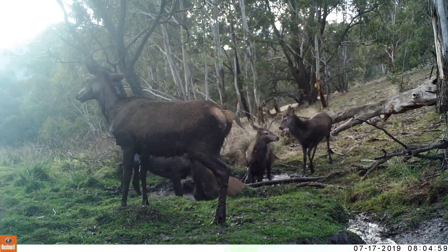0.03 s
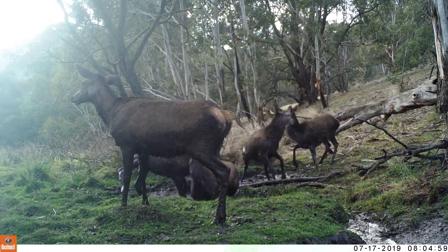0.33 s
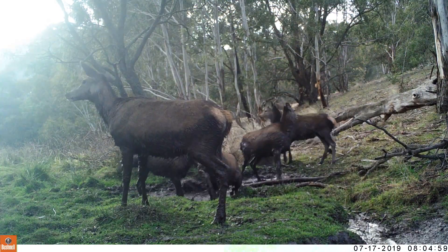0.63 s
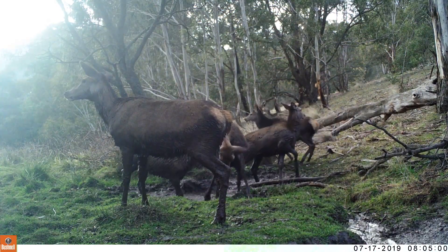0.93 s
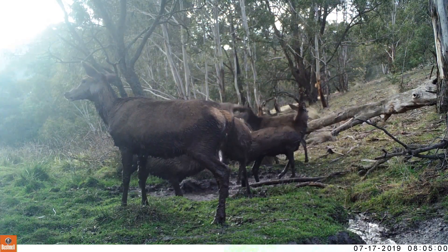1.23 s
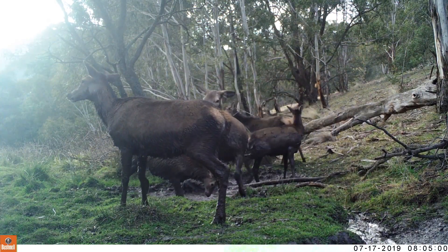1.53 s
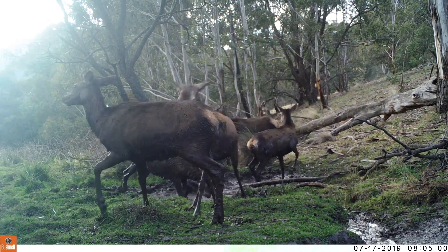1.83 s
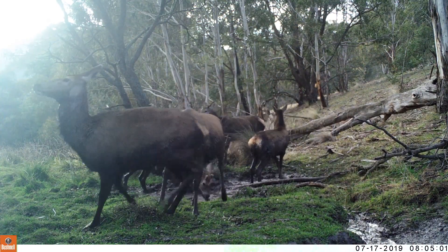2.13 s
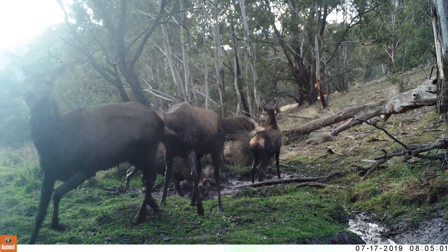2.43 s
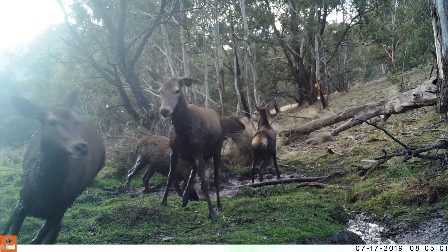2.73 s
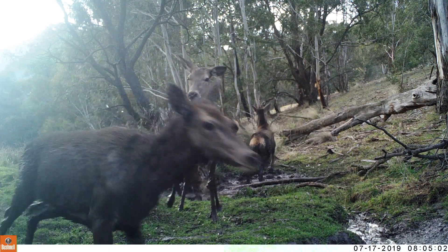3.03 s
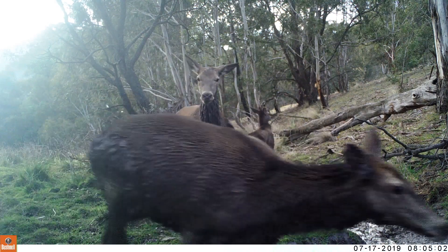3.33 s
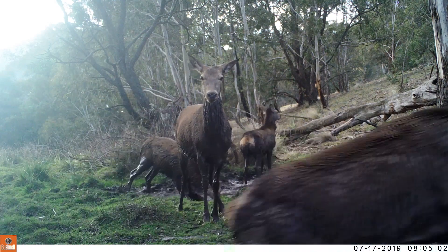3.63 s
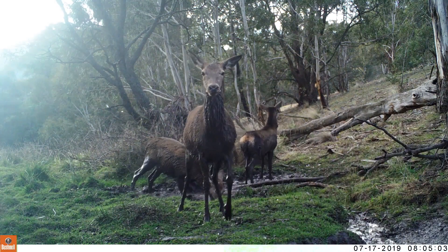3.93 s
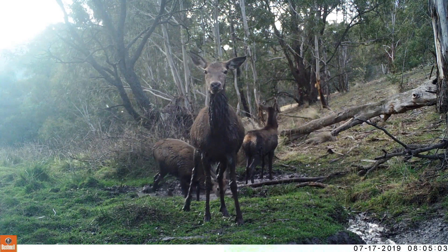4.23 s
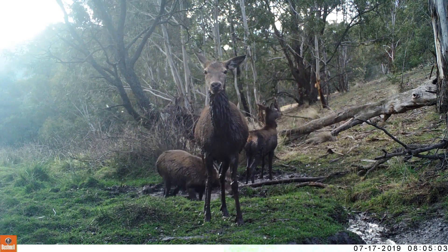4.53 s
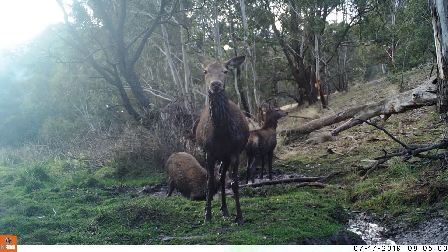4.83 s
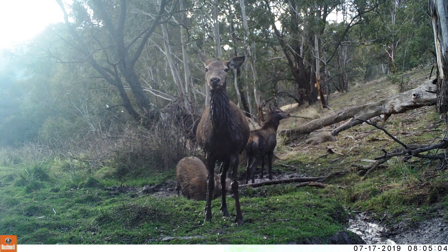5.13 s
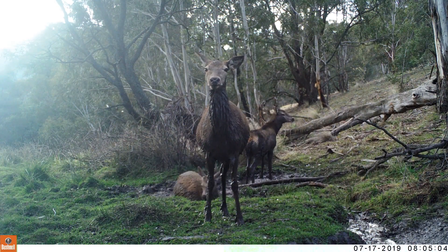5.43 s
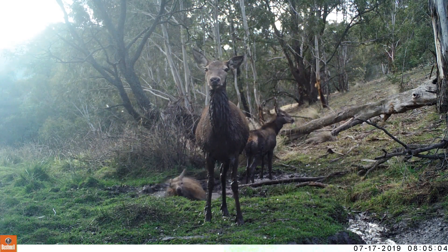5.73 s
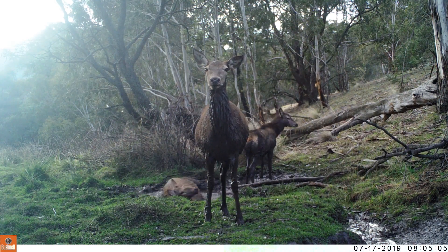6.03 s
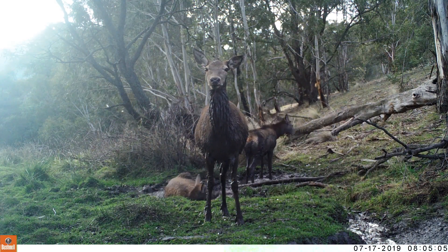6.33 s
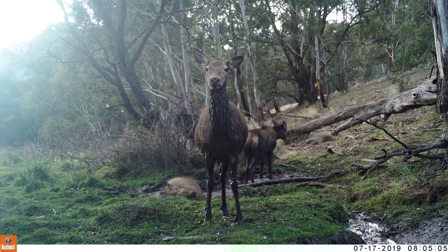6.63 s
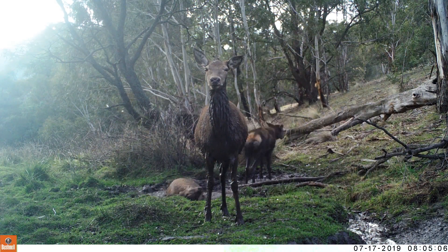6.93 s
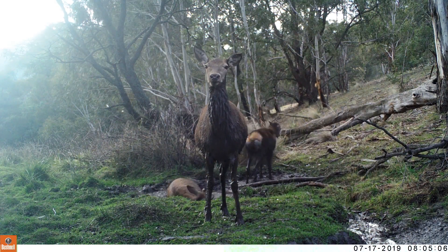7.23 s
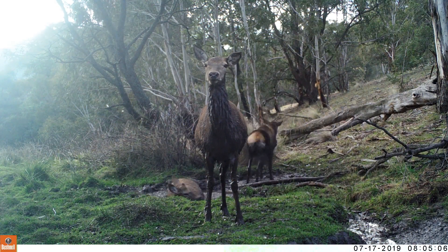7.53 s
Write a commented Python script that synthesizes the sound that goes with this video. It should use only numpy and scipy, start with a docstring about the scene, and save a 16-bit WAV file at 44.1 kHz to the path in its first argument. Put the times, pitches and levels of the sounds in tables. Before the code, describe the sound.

In quiet, damp woods, air flutters softly on a fixed outdoor microphone above a hollow hiss. Deer hooves thump and squish irregularly in wet turf, with a faint slosh of mud further off. The steps grow closer and busier in the middle, with sharp little ticks of breaking stems, then settle. A soft rustle of leaves and pattering drops rises at the end.

```python
"""Deer at a muddy wallow

Deer move about in damp woodland; one walks right past a camera on a post. Hooves thud dully on soft ground,
squeeze water through the turf and snap small stems; bubbles pip and mud sloshes further off. Moving air rumbles
on the microphone over a thin hiss; about a second in, the midrange of this background turns hollow and
wavering. At the end a breeze sets the wet leaves pattering."""
import sys
import numpy as np
from scipy import signal
from scipy.fft import rfft, irfft, next_fast_len
from scipy.io import wavfile
from scipy.ndimage import uniform_filter1d, map_coordinates

SR = 44100
rng = np.random.default_rng(int(sys.argv[2]) if len(sys.argv) > 2 else 0)


def wrap_up_sound(samples):
    """Save the sound to the file named by the first command line argument, as 16-bit audio."""
    columns = np.atleast_2d(samples).T
    # keep every value between -1 and 1, then stretch to whole-number steps
    tamed = np.clip(columns, -1, 1)
    steps = np.round(tamed * 32767).astype(np.int16)
    wavfile.write(sys.argv[1], SR, steps)


N = 338688
SETTLE_S = 4.39  # the herd starts to settle here

# Sub-bass of buffeting air and heaving ground: freq_hz, level_db
SUB_SPECTRUM = [(4, 3.5), (10, 6.5), (20, -8.5), (32, 2), (50, -12.5), (80, -14.5), (130, -32),
                (250, -46.5), (600, -67.5), (2000, -110)]
# Bright fizz of wet turf and mud: freq_hz, level_db
WET_SPECTRUM = [(300, -9.5), (1400, -7), (1900, -75), (2200, -2), (3500, 2), (5000, 4), (6200, 1.5),
                (7200, -6.5), (8500, -7), (10500, -17), (14000, -38)]


def amp(db):
    """Decibels to gain."""
    return 10 ** (np.asarray(db) / 20)


def unit(x):
    """Scale to rms 1."""
    return x / np.sqrt(np.mean(x ** 2) + 1e-20)


def clock():
    """The time of every sample in seconds."""
    return np.arange(N) / SR


def filtered(x, response):
    """EQ x with a gain given as a function of frequency."""
    size = next_fast_len(N + 8192)
    return irfft(rfft(x, size) * response(np.fft.rfftfreq(size, 1 / SR)), size)[:N]


def coloured(x, spectrum):
    """Shape x with an EQ curve of (freq_hz, level_db) points, at rms 1."""
    freq_hz, level_db = np.transpose(spectrum)
    return unit(filtered(x, lambda hz: amp(np.interp(np.log(hz + 1), np.log(freq_hz), level_db))))


def noise():
    """White noise."""
    return rng.standard_normal(N)


def wobble(rate_hz):
    """A smooth random curve with rate_hz knots a second."""
    return map_coordinates(rng.standard_normal(1024), [clock() * rate_hz], mode="wrap")


def steadied(x, span_s):
    """Level a noise, evening out swells slower than span_s."""
    size = max(int(span_s * SR), 8)
    power = uniform_filter1d(uniform_filter1d(x ** 2, size), size)
    return x / np.sqrt(np.abs(power) + 1e-9)


def crackle(rate_hz, spread_db, blur_db):
    """Tiny impacts of uneven size over the blur of countless smaller ones."""
    sizes = amp(spread_db * np.minimum(rng.exponential(size=N), 4)) * np.sign(noise())
    impacts = sizes * (rng.random(N) < rate_hz / SR)
    return unit(unit(impacts) + amp(blur_db) * noise())


def swell(level_db, at_s, rise_db_per_s, fall_db_per_s):
    """An envelope that ramps to level_db at at_s, then falls or holds."""
    t = clock() - at_s
    return amp(level_db + rise_db_per_s * np.minimum(t, 0) - fall_db_per_s * np.maximum(t, 0))


def push(start_s, attack_s):
    """A load that starts softly, peaks attack_s later and dies away."""
    age = np.maximum(clock() - start_s, 0) / attack_s
    return (age * np.exp(1 - age)) ** 2


def pings(rows, cycles, tail_db, tail_t60_s):
    """Short damped rings of so many cycles; the grass around scatters a faint tail."""
    out, t = np.zeros(N + SR), np.arange(SR // 20) / SR
    scatter = coloured(noise(), WET_SPECTRUM)
    for start_s, peak_db, pitch_hz in rows:
        start = min(round(start_s * SR), N - 1)
        age = t * pitch_hz / cycles
        ring = 2 * age * np.exp(1 - 2 * age) * np.sin(2 * np.pi * pitch_hz * t)
        tail = amp(tail_db - 60 * t / tail_t60_s) * np.roll(scatter, -start)[:len(t)]
        out[start:start + len(t)] += amp(peak_db) * (ring + tail)
    return out[:N]


def air_bed():
    """Air flutters on the microphone over a low rumble and a thin, even hiss."""
    # Strength of the draught, with a lull before the breeze: time_s, level_db
    draught = [(0, -44.5), (1.2, -48), (2.1, -47), (3.3, -47), (5.3, -46.5), (5.8, -49.5), (6.45, -49.5),
               (7.0, -47), (7.68, -44.5)]
    # Low woodland rumble: freq_hz, level_db
    rumble_spectrum = [(20, -14), (60, -0.5), (115, -2), (160, -5), (250, -10), (450, -17), (690, -22),
                       (810, -18), (950, -25), (1300, -28.5), (1600, -30.5), (2000, -52), (4000, -75)]
    # Thin hiss: freq_hz, level_db
    hiss_spectrum = [(300, -38), (1300, -3), (1620, 0.5), (1950, 2), (2200, -2.5), (3400, -3), (4600, -1),
                     (6100, -4), (6900, -8), (8200, -10), (10000, -12), (14000, -18.5)]
    buffet_db = np.interp(clock(), *np.transpose(draught)) + 2.5 * wobble(13)
    buffet = amp(buffet_db) * steadied(coloured(noise(), SUB_SPECTRUM), span_s=0.029)
    rumble = amp(-56.5 + 1.26 * wobble(14)) * coloured(noise(), rumble_spectrum)
    hiss = amp(-69) * coloured(noise(), hiss_spectrum)
    return buffet + rumble + hiss


def air_puffs():
    """Each puff of air swings the pressure on the microphone once: a soft, low bump."""
    # Puffs of air: centre_s, peak_db, half_width_s
    puffs = [(0.038, -27, 0.0093), (0.149, -27, 0.0076), (0.533, -39, 0.0083), (0.783, -34, 0.01),
             (1.174, -37.5, 0.014), (1.953, -38, 0.0096), (2.122, -42.5, 0.017), (2.282, -46, .007),
             (4.243, -35.5, 0.014), (5.343, -29, 0.017), (6.601, -39.5, 0.0059), (6.666, -40.5, 0.013),
             (7.099, -35, 0.0062), (7.363, -36, .012), (7.432, -36, .011), (7.569, -30, 0.0084)]
    out, t = np.zeros(N), clock()
    for centre_s, peak_db, half_width_s in puffs:
        age = (t - centre_s) / half_width_s
        out += amp(peak_db) * age * np.exp(0.5 * (1 - age ** 2))
    return out


def hollowed(x):
    """Wandering notches open about a second in and turn the midrange hollow and watery."""
    # Midrange notches: centre_hz, half_width_hz, depth_db, waver_ratio
    notches = [(804, 50.6, 30, 0.38), (1447, 26, 15, 3), (1663, 92, 37, 0.83), (1925, 120, 36, 0.26)]
    hz, t, spectra = signal.stft(x, SR, nperseg=1024, noverlap=768)
    opened = np.interp(t, [0.89, 0.93], [0, 1])
    for centre_hz, half_width_hz, depth_db, waver in notches:
        spread = np.interp(t, clock(), wobble(34))
        stray = np.interp(t, clock(), wobble(34))
        width = half_width_hz * np.maximum(1 + waver * spread, 0.01)
        centre = centre_hz + 0.93 * waver * half_width_hz * stray
        dip = 1 / (1 + ((hz[:, None] - centre) / width) ** 8)
        spectra = spectra * amp(-depth_db * opened * dip)
    return signal.istft(spectra, SR, nperseg=1024, noverlap=768)[1][:N]


def leaves():
    """Wet leaves brush together in small clumps as the breeze rises and holds; drops patter on them."""
    # Leaves brushing: freq_hz, level_db
    leaf_spectrum = [(300, -25), (650, -39), (800, -29), (920, -2.5), (1200, -2.5), (1500, 0.5), (1750, 1),
                     (1950, 14), (2150, -7), (3400, -4), (4500, -1), (5700, -8), (7000, -9), (10000, -18),
                     (14000, -49)]
    # Drops tapping on wet leaves: freq_hz, level_db
    drop_spectrum = [(800, -42), (2800, -10), (4000, 2), (4650, 1), (5600, 1), (7500, -12), (14000, -34)]
    clumps = amp(1.5 * wobble(70))
    rustle = clumps * coloured(crackle(rate_hz=1600, spread_db=3.5, blur_db=3), leaf_spectrum)
    patter = amp(4 * wobble(160))
    drops = patter * coloured(crackle(rate_hz=900, spread_db=1.5, blur_db=0), drop_spectrum)
    breeze = swell(-60.5, at_s=7.016, rise_db_per_s=34, fall_db_per_s=0)
    return breeze * (rustle + amp(-5.5) * unit(drops))


def wallow():
    """Further off, trampled mud fizzes restlessly, and one deer heaves itself out with a dull slosh."""
    # Thick mud sloshing: freq_hz, level_db
    mud_spectrum = [(150, -16), (450, 1.5), (820, -14.5), (1200, -8), (1900, -29), (2200, -14), (4000, -13),
                    (9000, -68)]
    churn = amp(1.3 * wobble(30))
    herd = swell(-71.5, at_s=SETTLE_S, rise_db_per_s=0, fall_db_per_s=45)
    splash = swell(-72.5, at_s=0.82, rise_db_per_s=13, fall_db_per_s=77)
    body = swell(-71, at_s=0.82, rise_db_per_s=-0.5, fall_db_per_s=77)
    fizz = coloured(crackle(rate_hz=1200, spread_db=2.5, blur_db=2), WET_SPECTRUM)
    slosh = coloured(crackle(rate_hz=700, spread_db=4, blur_db=5), mud_spectrum)
    return churn * (np.hypot(herd, splash) * fizz + body * slosh)


def herd_steps():
    """The herd treads lightly at random until it settles: rows for hoof_squelches."""
    rate_hz, half_width_s, smack_db, spit_db = 3.6, 0.0027, -1.5, -20
    gaps, weights = rng.random((64, 2)).T
    times_s = np.cumsum(0.5 + gaps) / rate_hz
    levels_db = -65.5 + 5 * (weights - 0.5)
    return [(crest_s, level_db, half_width_s, smack_db, spit_db)
            for crest_s, level_db in zip(times_s, levels_db) if crest_s < SETTLE_S]


def bubbles():
    """A bubble or drip rings for a few cycles: a tiny pip."""
    # Bubbles and drips: start_s, peak_db, pitch_hz
    pips = [(.7203, -49.5, 3680), (.856, -41.5, 5650), (1.675, -48, 5950), (2.0318, -45, 6150),
            (2.232, -54, 5600), (3.0402, -46, 4600), (3.0435, -50.5, 1710), (3.507, -51, 1650),
            (3.5095, -52, 1110), (3.5625, -58.5, 1770), (6.3483, -57, 3930), (6.8395, -52.5, 4130),
            (6.9542, -50, 4090), (7.0145, -47, 4740), (7.101, -46, 3970), (7.1318, -51, 5250),
            (7.1742, -48, 4630), (7.283, -50, 4190), (7.3697, -49, 4650), (7.5563, -49, 4300),
            (7.642, -44, 4660)]
    return pings(pips, cycles=3, tail_db=-17, tail_t60_s=0.025)


def stem_snaps():
    """A stem breaks underfoot in about one cycle: a sharp tick."""
    # Cracking stems: start_s, peak_db, pitch_hz
    snaps = [(.4405, -44.5, 4400), (1.0695, -58, 6500), (2.6486, -41, 5700), (3.045, -47, 2330),
             (3.0484, -35, 5300), (3.312, -50, 6000), (3.3285, -50, 6500), (3.4625, -46, 2980),
             (3.5135, -39.5, 2440), (3.6374, -47.5, 4600), (3.848, -49, 5500), (3.8571, -41.5, 3930),
             (3.8862, -43, 6600), (3.9355, -41, 7000), (3.9546, -26, 7100), (4.1145, -45, 3600),
             (4.131, -52, 5500), (4.2769, -42, 5150), (4.3795, -43, 4500), (4.4595, -46, 4500),
             (4.7275, -55, 3820), (5.0685, -46, 4120), (5.1285, -53, 4700), (7.6411, -40, 4560)]
    return pings(snaps, cycles=1.05, tail_db=-27, tail_t60_s=0.017)


def hoof_thuds():
    """Soft ground takes each hoof without ringing: a slap of mud on a low thud, over a slower heave."""
    # Heavy footfalls: start_s, level_db, attack_s, slap_db
    footfalls = [(0, -32.5, 0.0065, -28.5), (0.03, -39, 0.039, -68), (0.188, -33, 0.019, -43),
                 (.265, -36.5, 0.046, -64), (.365, -73, 0.015, -50), (1.165, -48, 0.023, -70),
                 (3.108, -35.5, 0.022, -58), (3.203, -36.5, 0.024, -52.5), (3.494, -40, 0.018, -51),
                 (3.669, -38, 0.0076, -60), (3.735, -50.5, 0.028, -50.5), (3.825, -38, 0.023, -52),
                 (3.995, -36.5, 0.034, -49), (4.292, -32.5, 0.031, -43.5), (4.337, -38, 0.024, -44),
                 (4.412, -38, 0.034, -57), (4.62, -34, 0.02, -59), (4.706, -33, 0.014, -62),
                 (4.749, -38.5, 0.022, -43), (4.792, -43, 0.022, -46.5), (4.927, -38, 0.021, -48),
                 (4.968, -41.5, 0.031, -49), (5.048, -39, 0.014, -52.5), (5.27, -33, 0.017, -44),
                 (5.325, -46, 0.058, -67)]
    # Dull thud of soft ground: freq_hz, level_db
    ground_spectrum = [(15, -56), (30, 11), (60, 8), (100, -4), (160, -32), (300, -44), (600, -60),
                       (2000, -87)]
    # Flat slap of a hoof in mud: freq_hz, level_db
    slap_spectrum = [(40, -15.5), (90, -7.5), (130, 6), (200, -8.5), (300, -16), (450, -26), (700, -32),
                     (2000, -57)]
    thud_power, slap_power, heave_power = np.zeros((3, N))
    for start_s, level_db, attack_s, slap_db in footfalls:
        load = push(start_s, attack_s)
        thud_power += (amp(level_db) * load) ** 2
        slap_power += (amp(slap_db) * load) ** 2
        heave_power += (amp(level_db) * push(start_s, attack_s=0.052)) ** 2
    thud = np.sqrt(thud_power) * steadied(coloured(noise(), ground_spectrum), span_s=0.0081)
    slap = np.sqrt(slap_power) * steadied(coloured(noise(), slap_spectrum), span_s=0.02)
    heave = np.sqrt(heave_power) * steadied(coloured(noise(), SUB_SPECTRUM), span_s=0.035)
    return thud + slap + heave


def hoof_squelches():
    """Water fizzes through pressed turf; deep holes add a hollow smack, sharp steps a bright spit."""
    # Close hooves in wet turf: crest_s, level_db, half_width_s, smack_relative_db, spit_relative_db
    close_steps = [(.515, -64, 0.034, -10, -11), (.685, -66.5, 0.016, -14, -10),
                   (.725, -67.5, 0.014, 0, -20), (.79, -69.5, 0.027, -9, -25), (.875, -67, 0.018, -16, -6),
                   (1.075, -74.5, 0.0073, -20, 4), (1.686, -66.5, 0.018, -5, -23),
                   (1.889, -66, 0.0066, -2, -25), (2.018, -68, 0.034, -11, -22),
                   (2.236, -65.5, .011, -8, -16), (2.463, -66, .009, -5, -10),
                   (2.648, -68.5, 0.018, -4, -6), (2.79, -67, .009, -4, -7), (2.868, -67.5, 0.0029, -23, 1),
                   (3.0445, -57.5, .0055, -2, -21), (3.06, -64.5, .012, -6, -20),
                   (3.315, -57, 0.0049, -18, -9), (3.41, -64, 0.015, -8, -4),
                   (3.452, -60.5, 0.014, -4, -15), (3.5098, -55.5, 0.008, -5, -6),
                   (3.563, -59.5, 0.0062, -3, -9), (3.796, -65.5, 0.0056, 2, -25),
                   (3.86, -62, 0.0079, -25, -14), (3.937, -53, 0.0029, -28, -8),
                   (3.966, -65, 0.014, -7, -12), (4.064, -65.5, 0.015, -8, -14),
                   (4.124, -61, 0.019, -33, -5.5), (4.279, -58, .0028, -28, -9),
                   (4.381, -65.5, 0.014, -11, -13), (4.735, -69.5, 0.06, -38, -26),
                   (5.075, -59.5, 0.0071, -32, -12), (5.135, -65.5, 0.017, -30, -6),
                   (5.791, -62.5, 0.0056, -27, -24), (6.349, -68, 0.0035, -14, -25),
                   (6.846, -66.5, 0.013, -4, -14), (6.956, -65, 0.0042, -14, -25)]
    # Hollow smack of a deep hoof hole: freq_hz, level_db
    smack_spectrum = [(300, -30), (800, -40), (1100, -20), (1500, -9), (1900, -13), (2130, 5.5), (2500, 4),
                      (3400, -5), (6000, -47), (14000, -55)]
    # Fine spray spat from under a hoof: freq_hz, level_db
    spit_spectrum = [(2500, -54), (5000, -11), (7000, 4), (9000, -4.5), (11500, -10.5), (14000, -22)]
    fizz, smack, spit = np.zeros((3, N))
    t = clock()
    for crest_s, level_db, half_width_s, smack_db, spit_db in list(close_steps) + herd_steps():
        near = np.abs(t - crest_s) < 0.3
        offset_s = t[near] - crest_s
        # The hoof presses in quickly and lets go more slowly.
        flank_s = half_width_s * np.where(offset_s < 0, 0.85, 1.1)
        steepness = np.where(offset_s < 0, 3.6, 3)
        press = amp(level_db) / np.hypot(1, (np.abs(offset_s) / flank_s) ** steepness)
        fizz[near] += press
        smack[near] += press * amp(smack_db)
        spit[near] += press * amp(spit_db)
    water = coloured(crackle(rate_hz=2200, spread_db=3, blur_db=-6), WET_SPECTRUM)
    pockets = coloured(crackle(rate_hz=1100, spread_db=6.5, blur_db=-15), smack_spectrum)
    droplets = coloured(crackle(rate_hz=1200, spread_db=3, blur_db=-8), spit_spectrum)
    return (fizz * steadied(water, span_s=0.006)
            + smack * steadied(pockets, span_s=0.0032)
            + spit * steadied(droplets, span_s=0.005))


def scene():
    """A mono mix in open air; squelches, snaps and pips stand clear of the hollow bed."""
    bed = hollowed(air_bed() + wallow() + leaves() + hoof_thuds())
    return (bed + air_puffs() + hoof_squelches() + stem_snaps() + bubbles())[None]


def record(dry):
    """The camera cuts off the highest treble."""
    cutoff_hz = 14100
    return filtered(dry[0], lambda hz: hz < cutoff_hz)[None]


dry = scene()
out = record(dry)
wrap_up_sound(out)
```